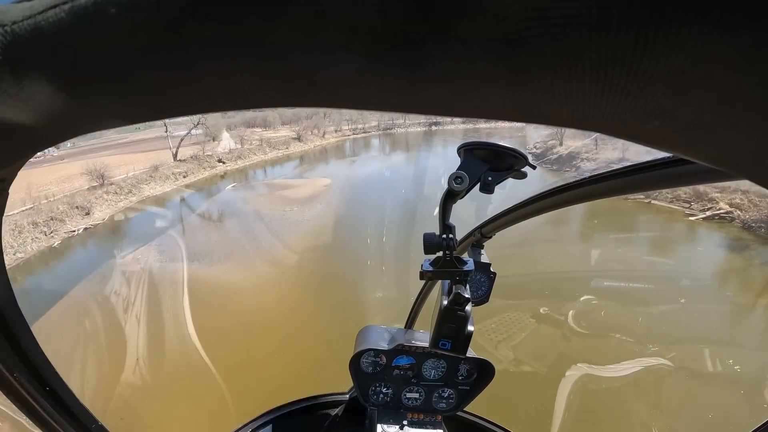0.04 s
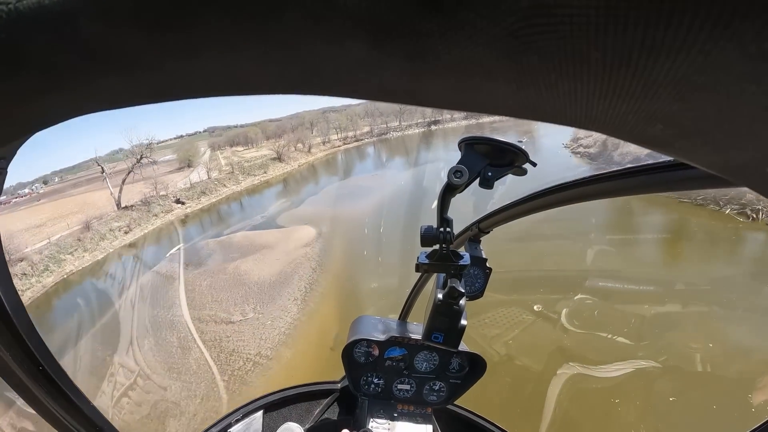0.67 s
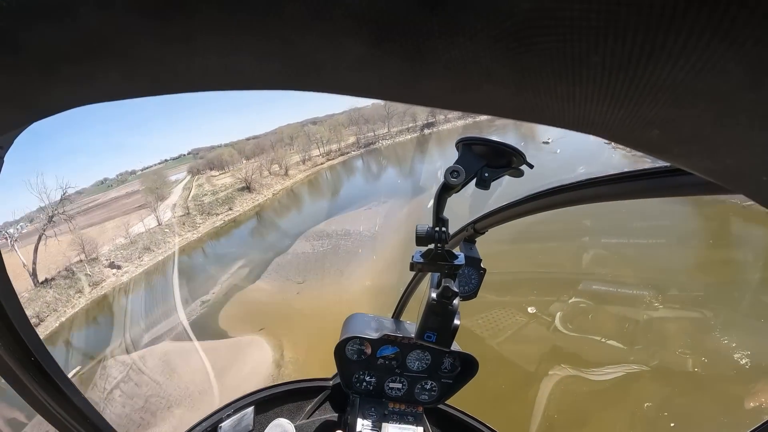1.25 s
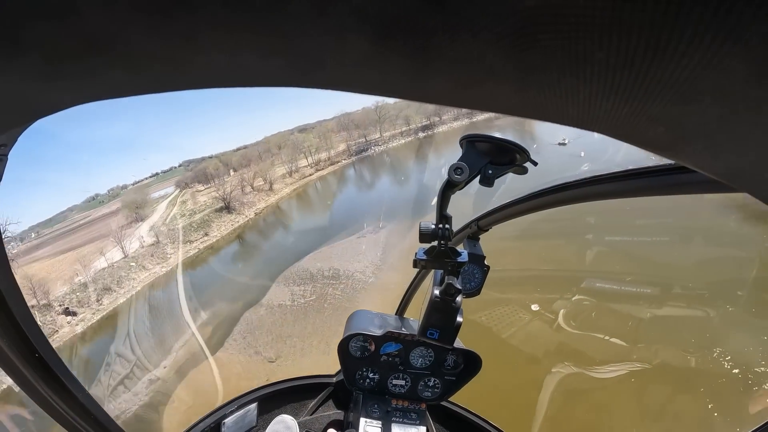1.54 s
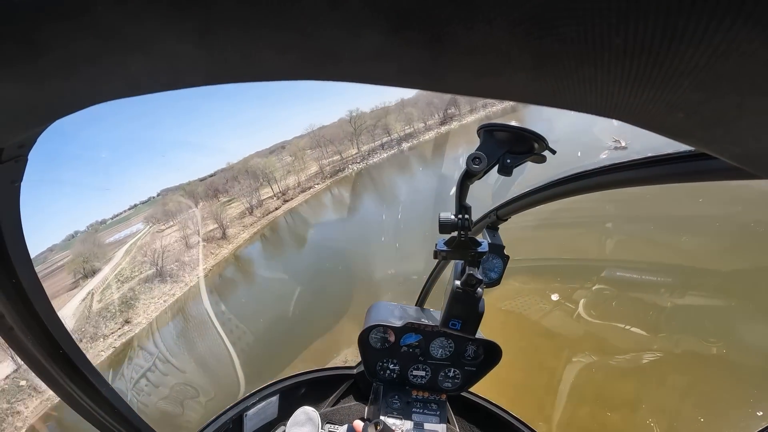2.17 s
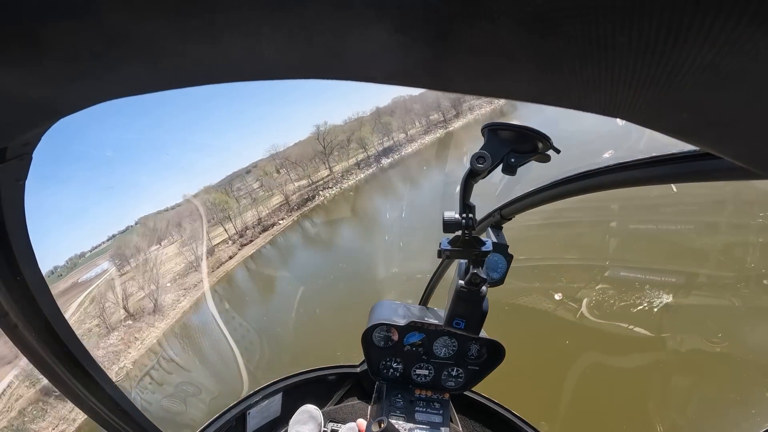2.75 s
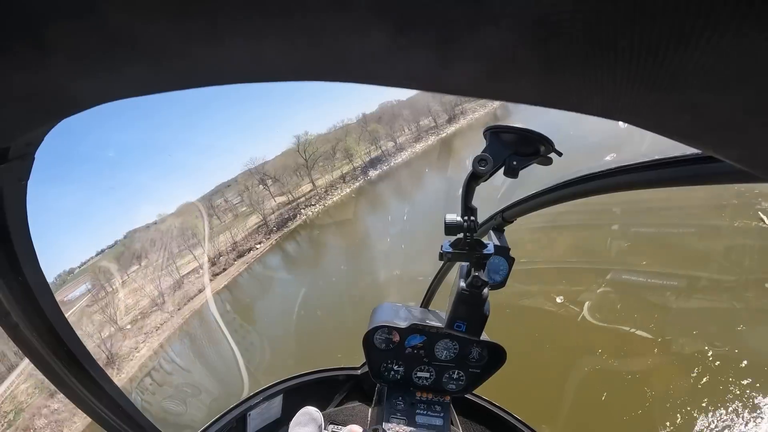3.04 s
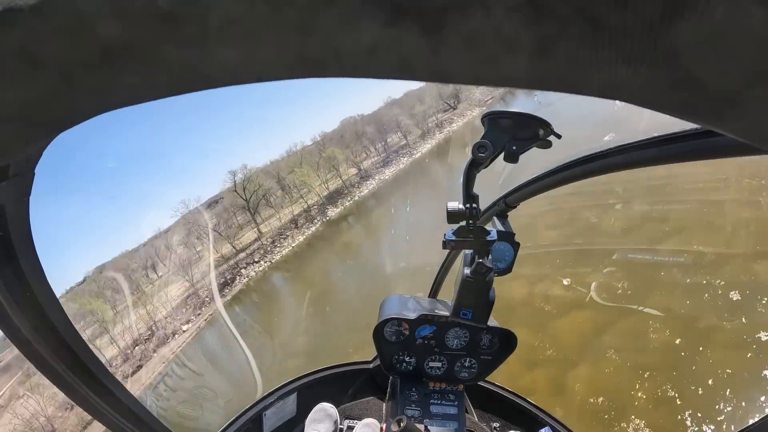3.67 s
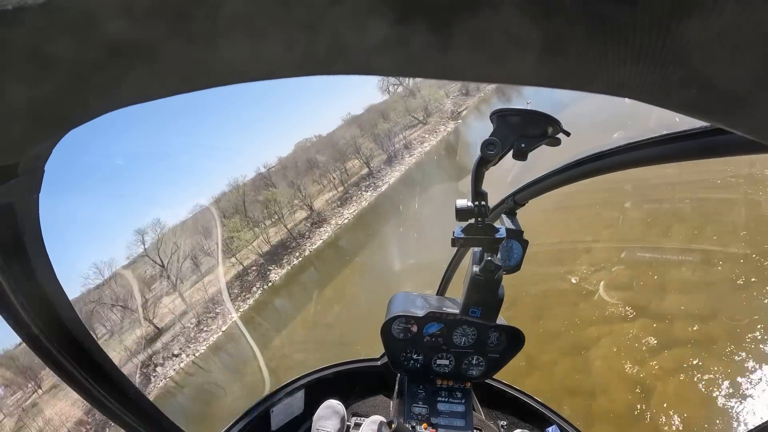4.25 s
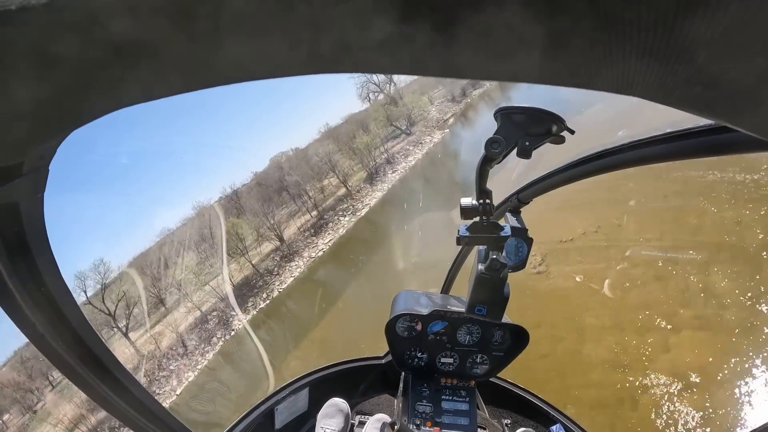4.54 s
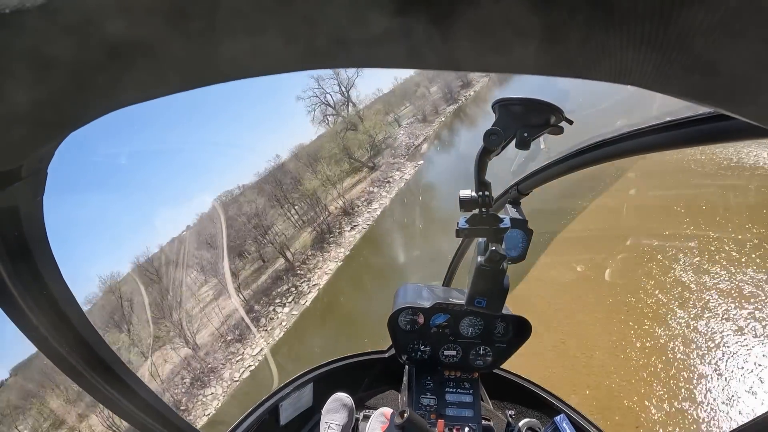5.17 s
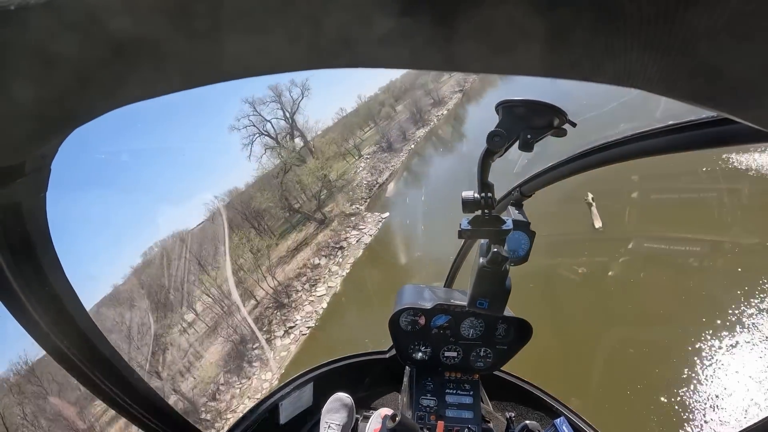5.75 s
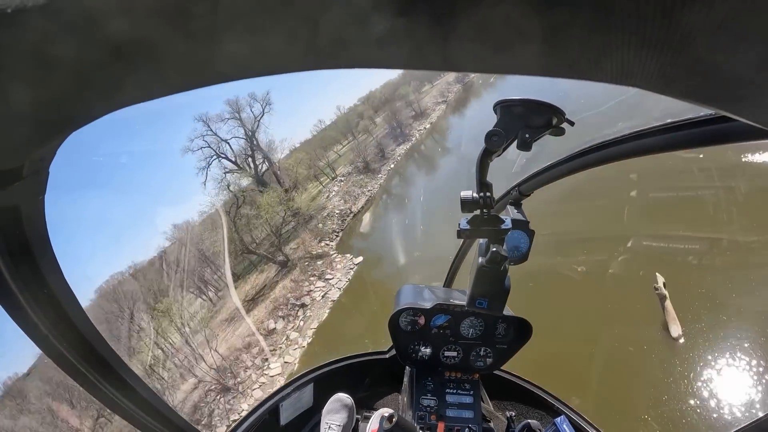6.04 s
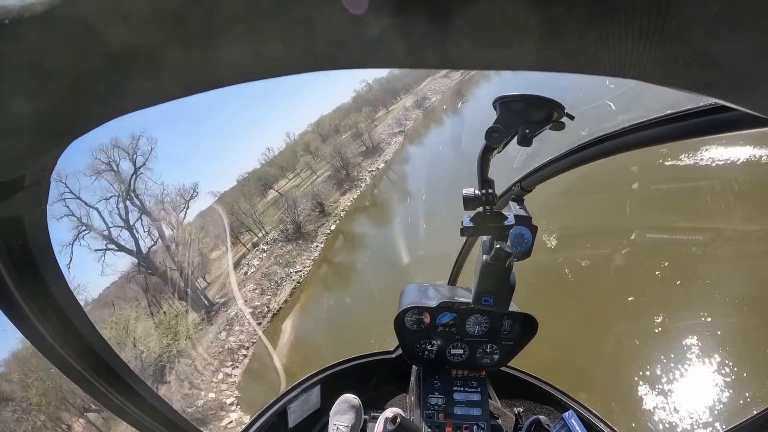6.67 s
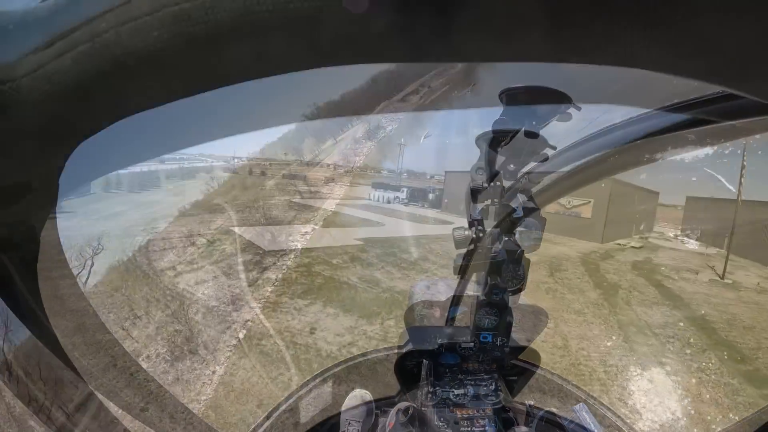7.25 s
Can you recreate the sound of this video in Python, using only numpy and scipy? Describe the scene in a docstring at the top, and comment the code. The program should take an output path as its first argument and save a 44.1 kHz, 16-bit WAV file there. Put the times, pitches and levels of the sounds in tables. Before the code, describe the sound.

Inside a small helicopter in flight, a steady low engine drone and air roar continue while the blades knock and crack in rapid runs.

```python
"""Inside a small piston helicopter as it banks low over a river.
From the start the two-blade rotor throbs over the hum of six cylinders, tail rotor and gears; air roars
round the cabin and hisses at the door seals, which chirp faintly after every blade. About two seconds in,
the turn steepens and the blades slap their own wake in bouts, knocking and cracking through the cabin.
Near seven seconds the cabin sound starts to crossfade into a brighter, wider rushing noise."""
import sys
import numpy as np
from scipy import signal
from scipy.fft import rfft, irfft
from scipy.io import wavfile
from scipy.ndimage import uniform_filter1d

SR = 44100
rng = np.random.default_rng(int(sys.argv[2]) if len(sys.argv) > 2 else 0)


def waveform_to_disk(signal):
    """Save audio, clipped to [-1, 1], as 16-bit WAV at the path in sys.argv[1]."""
    frames = np.transpose(np.atleast_2d(signal))
    scaled = np.clip(frames, -1, 1) * 32767
    samples = np.round(scaled).astype(np.int16)
    wavfile.write(sys.argv[1], SR, samples)


N = 326340
T = np.arange(N) / SR

# drive-train speed: time_s, blade_rate_hz
BLADE_RATE = [(0, 13.56), (3.8, 13.535), (4.3, 13.505), (7.4, 13.5)]
# blend from the level-flight sound (0) to the steep-turn sound (1): time_s, bank_share
BANK = [(0, 0.035), (1.8, 0.018), (2.7, 0.69), (4.7, 0.94), (5.2, 0.85), (6.9, 0.67), (7.4, 0.042)]
# rotor pressure wave: blade_rate_multiple, straight_db, banked_db
THROB = [(1, -28, -28.5), (2, -39, -42.5), (3, -36, -30.5), (6, -48.5, -40), (7, -45, -48), (8, -45.5, -35),
         (9, -38.5, -39.5), (11, -46.5, -39.5), (12, -51.5, -39.5), (13, -45.5, -37.5)]
# the throb rides the rotor's load: middle_s, length_s, gain_db
THROB_SWELLS = [(5.3, 1.8, -0.5), (6.6, 0.6, 3.5)]
# cabin boom: time_s, level_db
BOOM = [(0, -27), (1.4, -35), (2.1, -35), (3.0, -34), (4.599, -26.5), (5.2, -26), (5.8, -34), (6.7, -26.5),
        (7.25, -35)]
# firing tone: time_s, level_db, beat_depth
FIRING = [(0, -22.5, 0), (2.701, -24, 0.37), (6.9, -25, 0.18), (7.25, -26, 0.8)]
# engine overtones: crank_multiple, straight_db, banked_db
ENGINE = [(1, -47.5, -40), (2, -48, -38), (3.5, -47.5, -48.5), (4, -45, -35), (6, -45.5, -34.5),
          (10, -45, -46), (12, -58.5, -53.5)]
# exhaust note: time_s, level_db
EXHAUST = [(0, -30.5), (1.2, -30.5), (2.2, -28.5), (3.0, -38), (3.7, -36), (4.6, -30.5), (5.3, -29),
           (6.9, -30.5), (7.3, -39)]
# tail rotor's blade tone, following the pedal: time_s, level_db
TAIL_TONE = [(0, -47), (1.9, -42.5), (2.6, -33.5), (3.7, -31.5), (4.4, -37), (5.3, -41.5), (6.699, -46),
             (7.2, -28)]
# tail rotor overtones: tail_blade_multiple, straight_db, banked_db
TAIL_OVERTONES = [(2, -45.5, -35), (3, -39, -37.5), (4, -48, -46)]
# gear hum and whine: crank_multiple, straight_db, banked_db
GEARS = [(8, -36.5, -37), (24, -52.5, -59.5), (25.5, -60, -52.5)]
# rise and fall of the gears: middle_s, length_s, gain_db
GEAR_SWELLS = [(1.63, 1.3, 5.5), (3.4, 4.3, -4.5)]
# colours of the air roar, seal hiss and seal chirp: frequency_hz, relative_db
ROAR_COLOUR = [(10, -11.5), (28, -6), (60, -1), (110, -1), (200, 1.45), (350, -0.64), (460, -5),
               (720, -11.5), (950, -20), (1250, -28), (1800, -32.5), (2600, -43), (5000, -70.5)]
HISS_COLOUR = [(600, -16), (1500, -3.5), (2400, -1), (3300, 3.5), (5000, -5.5), (7000, -9.5), (8200, -14),
               (9300, -24.5), (10200, -21.5), (11500, -31.5), (12400, -21.5), (13400, -30), (15500, -31)]
CHIRP_COLOUR = [(3000, -9), (5500, -7.5), (7000, 5.5), (8200, 5), (9200, -6), (10000, -5), (11400, -10),
                (12150, 8.5), (12800, 6.5), (13700, 2.5), (15500, -6.5)]
# puffs of chirp within a blade pass: centre_passes, width_passes, gain
CHIRP_PUFFS = [(.225, .045, .5), (.35, .048, .7), (.3, .2, .48)]
# stereo width of the top treble; hiss and chirp are centred below 11 kHz: frequency_hz, side_db
TREBLE_WIDTH = [(10500, -39.5), (11200, -7), (11800, 1)]
# cabin modes rung by a slap: pitch_hz, t60_s, relative_db
CABIN_MODES = [(277.7, 0.03, -4), (377, 0.15, -17), (497, 0.018, -5), (642, 0.024, -10), (870, 0.013, -8)]
# a slap's paths into the cabin: delay_s, gain, blur_s
SLAP_PATHS = [(-.0006, -0.16, 0.00024), (0, 0.99, 0.00038), (.0053, -0.38, 0.00049), (.0066, 0.34, 0.00025),
              (.0089, -0.32, .0003), (0.0171, -0.29, 0.00033)]
# hard slaps of a blade on its wake: start_s, relative_db, crack_share
HARD_SLAPS = [(2.1126, 4, .05), (2.1852, 5.5, 0.2), (2.261, 5, .05), (2.333, 6.5, .6), (2.4084, 4.5, .1),
              (2.4821, 9.5, 0.6), (2.5556, 6, .65), (2.6287, 8, 0.3), (2.7767, 3, 0.1), (3.1459, 1.5, .15),
              (3.2197, 7, 0.6), (3.2948, 5, 0.8), (3.3689, 11.5, 0.9), (3.4425, 8, 0.2), (3.5163, 11, 0.4),
              (3.5901, 9.5, 1), (3.6643, 10.5, 1), (3.7369, 10, 1), (3.8113, 9.5, 0.5), (3.8842, 5, .2),
              (3.9576, 9, 1), (4.0321, 7.5, .8), (4.1064, 7.5, 0.5), (4.1793, 2, .05), (4.2534, 4, .1),
              (4.4015, 4, .05), (4.4761, 4, 0.1), (4.5503, 11, 0.1), (4.6243, 8, 0.7), (4.6985, 11, .7),
              (4.7724, 8.5, .6), (4.8468, 9, 0.7), (4.921, 9, 1), (4.9945, 7.5, .35), (5.069, 3.5, .3),
              (5.1426, 7, .45), (5.2172, 8.5, 1), (5.291, 7.5, .2), (5.8094, 10, 0), (5.8832, 11.5, 0.8),
              (5.9564, 6, .85), (6.0323, 7.5, .3), (6.1066, 8, 0.2), (6.9204, 4.5, 0.1), (7.069, 6, .05),
              (7.1422, 5, 0.4), (7.217, 5.5, 0.2)]
# colour of the closing rush: frequency_hz, relative_db
RUSH_COLOUR = [(60, 4.5), (200, 7), (500, 5.5), (800, 1.5), (1100, -1.5), (1500, -10.5), (2500, -24),
               (4000, -24.5), (7000, -33), (10000, -42), (12000, -46), (15500, -56)]
# stereo width of the rush: frequency_hz, side_db
RUSH_WIDTH = [(100, -11), (300, -11), (1000, -7)]


def gain_of(db):
    """Decibels to amplitude."""
    return 10 ** (np.asarray(db) / 20)


def unit_rms(x):
    """Scales to rms 1."""
    return x / np.sqrt(np.mean(x ** 2) + 1e-20)


def curve(rows):
    """An automation line through (time_s, value) rows."""
    return np.interp(T, *np.transpose(rows))


def swells(rows):
    """Smooth rises and falls from (middle_s, length_s, height) rows."""
    return sum(height * np.cos(np.pi * np.clip((T - middle_s) / length_s, -.5, .5)) ** 2
               for middle_s, length_s, height in rows)


def drift(rate_hz):
    """A random wobble of rms 1, moving at up to about rate_hz."""
    rolloff = np.exp(-(np.fft.rfftfreq(N, 1 / SR) / rate_hz) ** 2)
    return unit_rms(irfft(rfft(rng.standard_normal(N)) * rolloff, N))


def noise(colour, trim=((1, 0),)):
    """Coloured noise of rms about 1, then a trim EQ; both are (frequency_hz, gain_db) rows."""
    log_hz = np.log(np.fft.rfftfreq(N, 1 / SR) + 1)
    shape, eq = (gain_of(np.interp(log_hz, np.log(hz), db))
                 for hz, db in (np.transpose(colour), np.transpose(trim)))
    return irfft(rfft(rng.standard_normal(N)) * unit_rms(shape) * eq, N)


def wide_noise(colour, width):
    """Mid/side stereo noise."""
    side = noise(colour, trim=width)
    return noise(colour) + np.array([side, -side])


def banked(straight_db, banked_db):
    """Crossfades a tone's peak amplitude as the turn steepens."""
    return np.sqrt(2) * np.interp(curve(BANK), [0, 1], gain_of([straight_db, banked_db]))


def tone(cycles, levels, waver_rad, rate_hz):
    """One nearly clean tone riding (time_s, level_db) rows."""
    return np.sqrt(2) * gain_of(curve(levels)) * np.cos(2 * np.pi * cycles + waver_rad * drift(rate_hz))


def hum(cycles, partials, waver_rad, flutter_db, rate_hz):
    """Overtones of a turning part, each wavering in the moving air."""
    mix = np.zeros(N)
    for multiple, straight_db, banked_db in partials:
        level = banked(straight_db, banked_db) * gain_of(flutter_db * drift(rate_hz))
        phase = 2 * np.pi * (multiple * cycles + rng.random())
        mix += level * np.sin(phase + waver_rad * drift(rate_hz))
    return mix


def slap_clicks(heights):
    """One click of the given height at each hard slap."""
    return np.bincount([round(row[0] * SR) for row in HARD_SLAPS], heights, N)[:N]


def slap_density(weights, span_s):
    """Mean weight of the hard slaps per blade pass, over span_s."""
    return uniform_filter1d(slap_clicks(weights), size=round(span_s * SR)) * SR / curve(BLADE_RATE)


def air_duck_db(bank_db, bout_db):
    """Air noise sinks as the turn steepens, and further during a bout of cracking slaps."""
    cracking = slap_density(np.transpose(HARD_SLAPS)[2], span_s=0.26)
    return bank_db * curve(BANK) + bout_db * uniform_filter1d(cracking, size=SR // 10)


def rush_fade(start_s=6.89, rise_s=0.31):
    """The 0-to-1 crossfade that brings in the rush and rebalances the air and engine around it."""
    return np.clip((T - start_s) / rise_s, 0, 1)


def rotor_throb(passes, spread_rad=0.9, flutter_db=2.0):
    """Each blade's pressure wave; the shell delays the higher multiples more, and booms on the fourth."""
    wave = sum(banked(*levels_db) * np.cos(2 * np.pi * k * passes - spread_rad * (k - 1) ** 2)
               for k, *levels_db in THROB)
    boom = tone(4 * passes, BOOM, waver_rad=0.19, rate_hz=2.9)
    return wave * gain_of(swells(THROB_SWELLS) + flutter_db * drift(32)) + boom


def engine(crank, beat_s=2.3, dip_at_s=5.13, waver_rad=0.061, rush_lift_db=1.5):
    """Three cylinders fire per crank turn; a slow swell plays their beat with the rotor's 10th multiple."""
    time_s, level_db, beat_depth = np.transpose(FIRING)
    level = np.sqrt(2) * gain_of(np.interp(T, time_s, level_db))
    beat = abs(1 - np.interp(T, time_s, beat_depth) * np.exp(2j * np.pi * (T - dip_at_s) / beat_s))
    firing = level * beat * np.sin(2 * np.pi * 3 * crank + waver_rad * drift(15))
    overtones = hum(crank, ENGINE, waver_rad=0.3, flutter_db=5.0, rate_hz=2.2)
    return firing + gain_of(rush_lift_db * rush_fade()) * overtones


def exhaust(crank):
    """One bank of cylinders drones at half the firing rate."""
    return tone(1.5 * crank, EXHAUST, waver_rad=0.08, rate_hz=3)


def tail_rotor(tail_passes):
    """The small, fast blades buzz: a blade tone and its overtones."""
    blade_tone = tone(tail_passes, TAIL_TONE, waver_rad=0.56, rate_hz=0.88)
    return blade_tone + hum(tail_passes, TAIL_OVERTONES, waver_rad=0.57, flutter_db=-2.5, rate_hz=0.75)


def gears(crank):
    """Meshing teeth hum and whine far above the crank rate."""
    return gain_of(swells(GEAR_SWELLS)) * hum(crank, GEARS, waver_rad=0.67, flutter_db=0.5, rate_hz=6.8)


def air_roar(level_db=-21.5, gust_db=0.5, rush_duck_db=-4):
    """Turbulent air on the cabin shell: a dark, slightly gusty bed."""
    duck_db = air_duck_db(bank_db=-0.94, bout_db=-0.45) + rush_duck_db * rush_fade()
    return noise(ROAR_COLOUR) * gain_of(level_db + duck_db + gust_db * drift(35))


def door_seals(passes, hiss_db=-54.5, chirp_db=-68.5, pulse_db=1.0, scatter_db=2.0, rush_duck_db=-5):
    """Air hisses past the doors and chirps under each blade's downwash."""
    pulse = np.cos(2 * np.pi * (passes - 0.087))  # crests just after each blade
    hiss_gain = gain_of(hiss_db + air_duck_db(bank_db=-1.9, bout_db=-1.4) + pulse_db * pulse)
    chirp_gain = gain_of(chirp_db + air_duck_db(bank_db=-3.5, bout_db=-7) + scatter_db * drift(20))
    puffs = sum(height * np.exp(-.5 * (((passes - centre + .5) % 1 - .5) / width) ** 2)
                for centre, width, height in CHIRP_PUFFS)
    hiss = hiss_gain * wide_noise(HISS_COLOUR, TREBLE_WIDTH)
    chirp = puffs * chirp_gain * wide_noise(CHIRP_COLOUR, TREBLE_WIDTH)
    return gain_of(rush_duck_db * rush_fade()) * (hiss + chirp)


def wake_grazes(passes, peak_s=3.54, length_s=11.1, peak_power=0.44, scatter_db=3.0, jitter_s=0.00068):
    """Outside the hard slaps each blade only brushes its wake: (start_s, strength) rows."""
    at = np.flatnonzero(np.diff(np.floor(passes)))
    in_gap = slap_density(np.ones(len(HARD_SLAPS)), span_s=0.06) < .5
    envelope = in_gap * np.sqrt(swells([(peak_s, length_s, peak_power)]))
    late, loud = rng.standard_normal((len(at), 2)).T
    return list(zip(T[at] + jitter_s * late, envelope[at] * gain_of(scatter_db * loud)))


def cabin_ring(detune=0.065, scatter_db=0.5):
    """Each blow meets the shell from a new angle and rings it a little differently."""
    t = T[:SR // 10]
    ring = np.zeros(len(t))
    for pitch_hz, t60_s, mode_db in CABIN_MODES:
        decay = gain_of(mode_db + scatter_db * rng.uniform(-1.7, 1) - 60 * t / t60_s)
        ring += decay * np.cos(2 * np.pi * pitch_hz * (1 + detune * rng.uniform(-0.9, 1)) * t)
    return ring


def blade_slap(passes, knock_db=-11.5, crack_db=-24.5, crack_blur_s=0.00022):
    """A blade cuts the tip vortex: the suction pulse rings the cabin by several paths; hard ones crack."""
    times_s, slap_db, crack_share = np.transpose(HARD_SLAPS)
    rings = np.zeros(N)
    for start_s, strength in list(zip(times_s, gain_of(slap_db))) + wake_grazes(passes):
        ring = cabin_ring()
        slot = rings[max(round(start_s * SR), 0):][:len(ring)]
        slot += strength * ring[:len(slot)]
    lag_s = T[:SR // 10] - T[SR // 20]
    arrivals = sum(gain * np.exp(-.5 * ((lag_s - delay_s) / blur_s) ** 2)
                   / (blur_s * SR * np.sqrt(2 * np.pi)) for delay_s, gain, blur_s in SLAP_PATHS)
    knock = signal.fftconvolve(rings, arrivals, "same")
    lag_squared = (lag_s / crack_blur_s) ** 2
    spike = (1 - lag_squared) * np.exp(-.5 * lag_squared)
    crack = signal.fftconvolve(slap_clicks(crack_share), spike, "same")
    return -gain_of(knock_db) * knock - gain_of(crack_db) * crack


def closing_rush(level_db=-34):
    """A brighter, wider rushing noise fades in over the last moments."""
    return wide_noise(RUSH_COLOUR, RUSH_WIDTH) * gain_of(level_db) * rush_fade()


def limiter(x, threshold_db, amount, release_db_per_s):
    """Grabs each peak and lets go, so the whole cabin ducks after a hard slap."""
    over_db = np.maximum(20 * np.log10(abs(x).max(0) + 1e-9) - threshold_db, 0)
    release_db = release_db_per_s * T
    held_db = np.maximum.accumulate(over_db + release_db) - release_db
    return x / gain_of(amount * uniform_filter1d(held_db, size=60))


def scene():
    """One drive train turns everything; the mix is centred but for the top treble and the closing rush."""
    passes = np.cumsum(curve(BLADE_RATE)) / SR  # running count of main blade passes
    passes -= np.interp(2.186, T, passes)  # a blade meets its wake at 2.186 s
    crank, tail_passes = 3.3435 * passes, 5.968 * passes  # geared to the main rotor
    rotor = rotor_throb(passes) + blade_slap(passes)
    machinery = engine(crank) + exhaust(crank) + tail_rotor(tail_passes) + gears(crank)
    noise_beds = air_roar() + closing_rush() + door_seals(passes)
    return rotor + machinery + noise_beds


def record(dry):
    """A peak limiter, then a steep cut of the very top treble."""
    limited = limiter(dry, threshold_db=-12.0, amount=0.78, release_db_per_s=81)
    lowpass = signal.firwin(511, 15700, window=("kaiser", 9), fs=SR)
    return signal.oaconvolve(limited, lowpass[None], "same")


dry = scene()
out = record(dry)
waveform_to_disk(out)
```